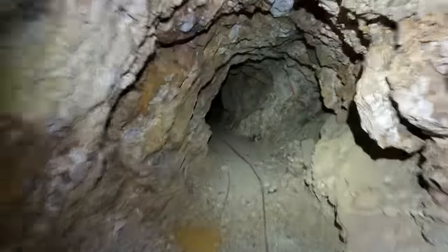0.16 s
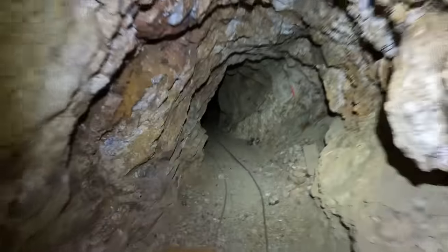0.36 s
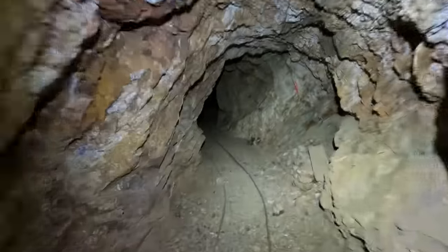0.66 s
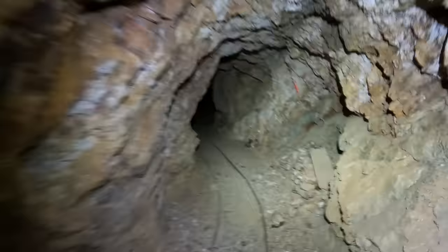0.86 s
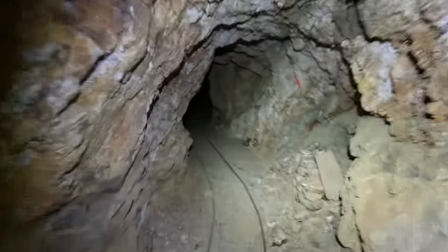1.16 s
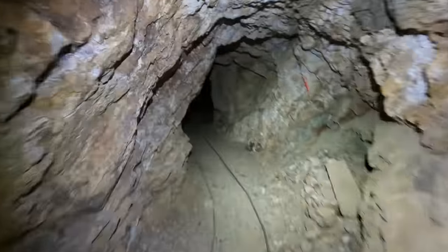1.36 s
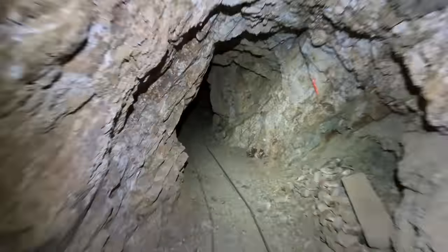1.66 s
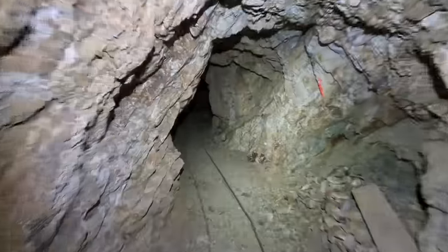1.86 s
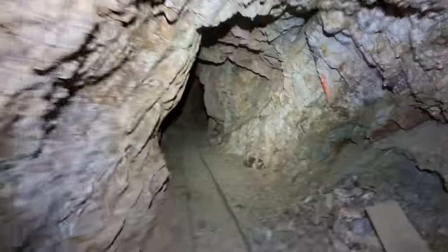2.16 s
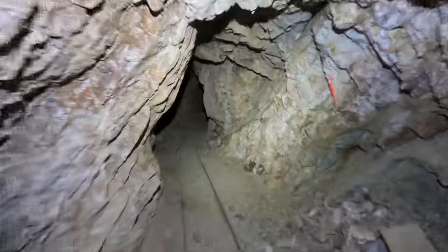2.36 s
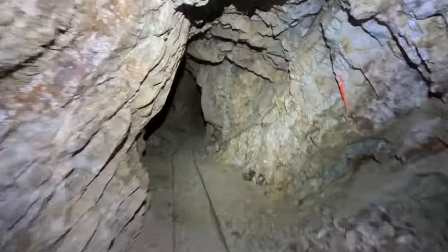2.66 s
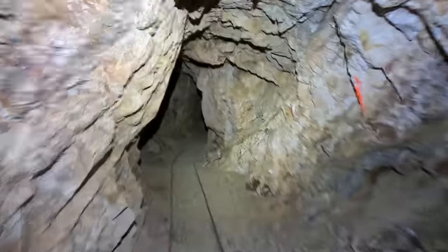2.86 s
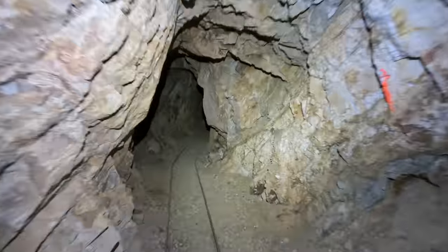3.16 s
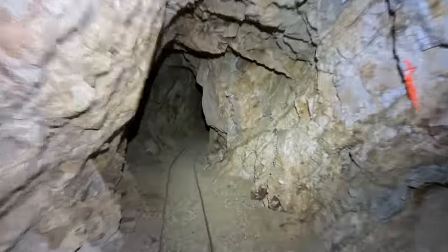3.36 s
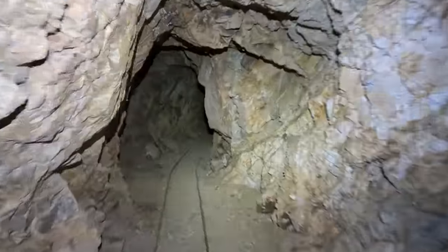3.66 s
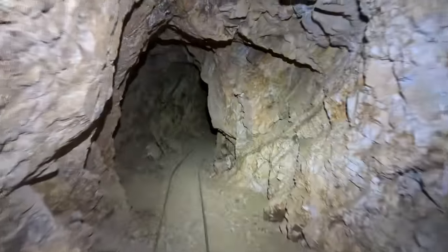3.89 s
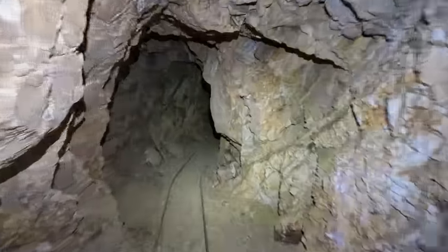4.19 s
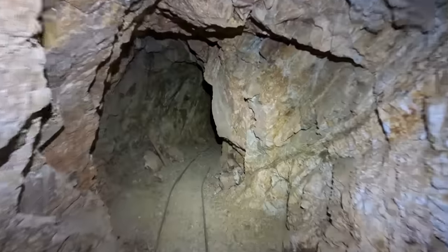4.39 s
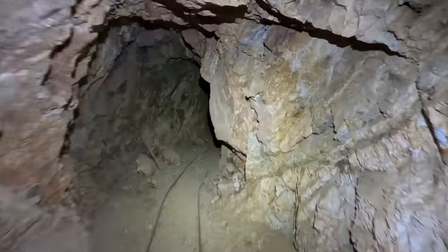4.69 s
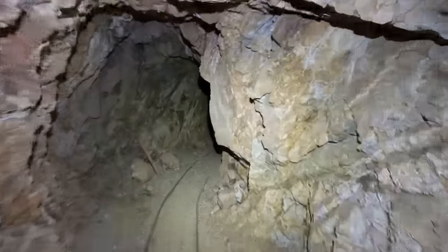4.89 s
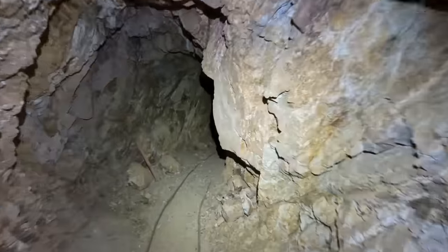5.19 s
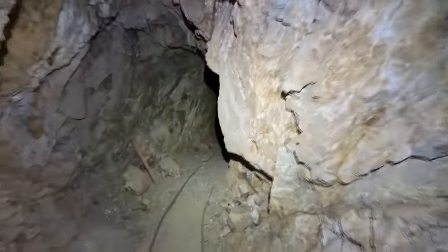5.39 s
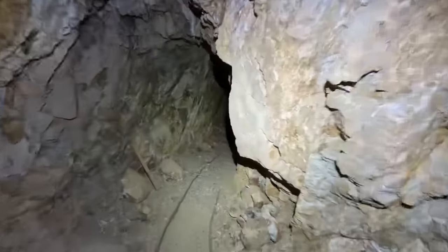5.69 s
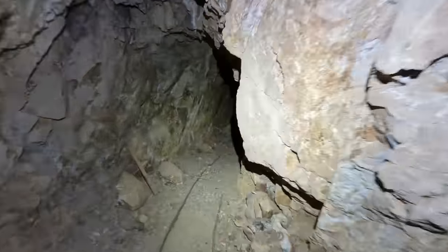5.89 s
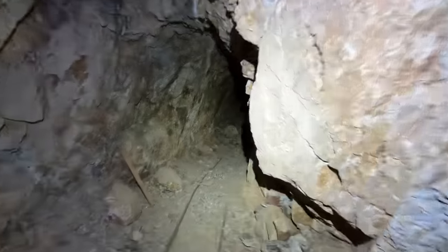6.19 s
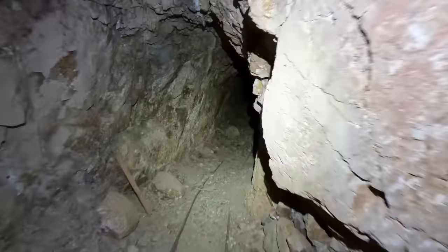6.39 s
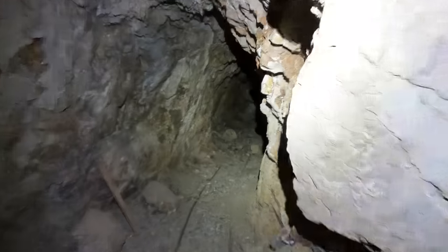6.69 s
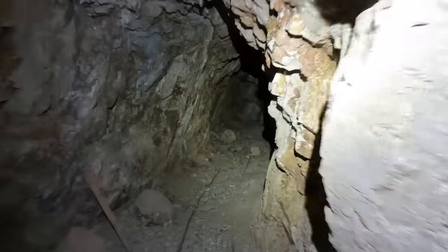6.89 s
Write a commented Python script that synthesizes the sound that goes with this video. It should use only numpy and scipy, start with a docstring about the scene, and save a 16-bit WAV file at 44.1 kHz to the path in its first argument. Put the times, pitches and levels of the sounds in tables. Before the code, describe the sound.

Boots grind rubble close below a carried stereo microphone. Sharp grit snaps and a woody thunk open the walk; small stones clatter, then softer steps and faint trickling follow. Firmer stone knocks land after four seconds, and the last second is busy with crunching. Deep soft rumbles jolt the microphone; the small tunnel adds a short dry tail.

```python
"""A narrow mine tunnel, loose rock and gravel underfoot; the walker carries a camera with two microphone ports.
From the start stones grind (ringing clicks), grit and cloth rasp (filtered grains) and strides shake the ports
(low noise); the rough walls add a short tail of sparse echoes. Soon grit snaps (noise bursts), then stones
knock (short rings and settling noise); a rocked loose board rings briefly near 0.3 s (decaying modes).
The steps go on to the end at 7 s, the loose ground trickling more faintly for a while around 4 s."""
import sys
import numpy as np
from scipy import signal
from scipy.fft import rfft, irfft, next_fast_len
from scipy.io import wavfile
from scipy.ndimage import uniform_filter1d

SR = 44100
rng = np.random.default_rng(int(sys.argv[2]) if len(sys.argv) > 2 else 0)


def wav_out(sig):
    """Save sig, one row per channel (or a flat mono array), as 16-bit PCM at SR to the path in sys.argv[1]."""
    wavfile.write(sys.argv[1], SR, np.round(np.clip(np.atleast_2d(sig).T, -1, 1) * 32767).astype(np.int16))


N = 310832

# Boot levels below (all but the jolts) are relative: scene() sets the boots' overall level.
# a boot loading the stones: [peak t/s, level/dB, weight of large stones/dB, last 10 dB of rise/ms, 10 dB fall/ms]
BOOT_LOADS = [(0.12, -61, -7, 30, 108), (0.26, -49.5, 21.5, 3, 153), (0.36, -33, -11, 79, 58),
              (0.6, -51.5, 13, 43, 211), (0.8, -38.5, -4, 55, 45), (0.885, -36.5, 2, 43, 57),
              (0.97, -37.5, 4.5, 23, 100), (1.05, -49, 6, 25, 50), (1.36, -58, 17.5, 20, 24),
              (1.5, -47, 1, 42, 172), (1.59, -40, 1, 25, 63), (1.66, -45, 8.5, 48, 36),
              (1.82, -54, -15, 28, 50), (2.178, -42, 0, 24, 105), (2.3, -47, 5.5, 38, 125),
              (2.599, -43, 2, 47, 95), (2.77, -44, -5, 48, 54), (2.885, -38, 2, 37, 80),
              (2.96, -40, 4.5, 48, 71), (3.05, -45, 1, 27, 64), (3.42, -49, -22, 87, 150),
              (3.575, -38, -1.5, 14, 70), (3.65, -38, -2, 80, 79), (3.79, -45.5, -3, 30, 37),
              (4.2, -51, 6, 106, 200), (4.3, -39.5, 1.5, 80, 62), (4.38, -32.5, 5.5, 46, 55),
              (4.66, -58.5, 9.5, 60, 108), (4.8, -47, -3, 88, 28), (4.86, -42, 7.5, 20, 60),
              (4.92, -33.5, 4.5, 35, 97), (5.22, -52.5, -1, 43, 82), (5.305, -50, -8, 9, 14),
              (5.46, -47.5, 0, 46, 41), (5.54, -36, 1, 15, 89), (5.605, -39, 9.5, 45, 53),
              (5.73, -41.5, -2, 31, 55), (5.811, -45.5, -1.5, 50, 79), (5.99, -47, -3.5, 34, 200),
              (6.155, -29, -2, 35, 35), (6.24, -44, 6, 60, 57), (6.4, -51, -9, 60, 97),
              (6.518, -43, 8, 36, 154), (6.67, -39, 11.5, 33, 35), (6.76, -44, 4.5, 60, 62),
              (6.82, -34, -3, 35, 90), (6.875, -38.5, 4.5, 52, 79)]
# loose ground trickling between the steps: [t/s, stones level/dB, grit level/dB]
TRICKLE = [(0.0, -54.5, -55.5), (0.7, -56, -56), (1.4, -59, -59), (1.95, -58, -57.5), (2.5, -67, -55),
           (3.2, -63, -66.5), (3.45, -60, -58), (3.88, -80, -65), (4.05, -88, -65), (4.6, -58, -75),
           (5.36, -81, -69), (5.95, -65, -60.5), (6.35, -54, -59), (7.05, -58, -59)]
TRICKLE_LARGE_DB, TRICKLE_GRIT_HZ = 4, 4750  # weight of large stones, pitch that stands out in the grit
# spectra of the small and the large stones: [f/Hz, relative level/dB]
SMALL_STONE_SPECTRUM = [(260, -9.5), (450, 4), (700, 3), (1050, 8.5), (1500, 5), (2300, -3.5),
                        (3500, -21.5), (5000, -48.5)]
LARGE_STONE_SPECTRUM = [(41, -58), (70, 11), (130, -5.5), (237, 2), (397, -0.5), (443, -4), (650, -10.5),
                        (840, -28.5), (1430, -120)]
# a sole scuffing through grit: [peak t/s, level/dB, strongest f/Hz, last 10 dB of rise/ms, 10 dB fall/ms]
SOLE_SCUFFS = [(0.254, -26, 6100, 10.5, 37), (0.33, -29.5, 5400, 19, 35), (0.389, -35.5, 4300, 28, 22),
               (0.5, -49.5, 4500, 104, 300), (0.585, -42.5, 3740, 15, 26), (0.72, -47, 4000, 22, 98),
               (0.89, -45, 4300, 33, 90), (1.03, -50, 3620, 150, 60), (1.154, -35, 4400, 10, 27),
               (1.361, -44.5, 5300, 120, 34), (1.53, -53, 4000, 31, 50), (1.61, -44, 3600, 64, 40),
               (1.75, -52.5, 3740, 38, 115), (1.945, -49, 7650, 33, 25), (2.195, -41.5, 4500, 16, 14),
               (2.32, -49.5, 5000, 59, 52), (2.45, -46, 5800, 67, 60), (2.55, -47, 5030, 28, 51),
               (2.6, -44.5, 4970, 50, 13), (2.75, -52.5, 5540, 139, 80), (2.9, -46, 4340, 94, 113),
               (3.274, -48.5, 5500, 35, 41), (3.575, -42, 3220, 13, 96), (3.7, -50.5, 4500, 102, 65),
               (3.945, -47, 5800, 20, 33), (4.18, -46.5, 4900, 54, 66), (4.27, -49.5, 3160, 43, 80),
               (4.334, -38, 4500, 11, 84), (4.43, -57, 6900, 28, 35), (4.615, -52, 5360, 36, 118),
               (4.81, -51, 3170, 72, 50), (4.9, -36.5, 3420, 37, 89), (4.966, -35, 3950, 31, 19),
               (5.05, -51, 3280, 30, 58), (5.22, -49, 4530, 31, 66), (5.47, -46.5, 4800, 61, 100),
               (5.54, -43.5, 3300, 17, 90), (5.61, -45, 3880, 60, 66), (5.82, -53.5, 4380, 150.5, 88),
               (6.07, -50.5, 4780, 46.5, 100), (6.152, -30, 4700, 21, 32), (6.23, -45.5, 3700, 50, 74),
               (6.41, -43.5, 6060, 67, 73), (6.489, -37.5, 4600, 40, 74), (6.585, -37.5, 5260, 31, 47),
               (6.66, -33, 4070, 17, 24), (6.74, -46.5, 3950, 60, 200), (6.811, -34.5, 4000, 13, 48),
               (6.88, -47.5, 3370, 53, 81)]
# spectrum of the grit before its moving resonance: [f/Hz, relative level/dB]
GRIT_SPECTRUM = [(1180, 7), (2000, 1.5), (3350, -1), (4220, -3), (4520, -4), (4930, -3), (5950, -4.5),
                 (7630, -3), (9630, -10), (12000, 2.5), (14200, -16.5), (15600, -4.5)]
# finest grains under the coarse ones: [t/s, level/dB]
FINE_GRAINS = [(0.0, 0.5), (1.0, -5), (2.8, -2), (3.4, -6), (7.05, -6)]
# strides jolting the camera: [peak t/s, level/dB, last 10 dB of rise/ms, 10 dB fall/ms]
STRIDE_JOLTS = [(0.33, -23, 200, 350), (0.58, -28, 350, 87), (0.84, -30.5, 51, 400), (1.04, -11, 39, 74),
                (1.37, -31, 300, 357), (1.8, -23.5, 150, 196), (2.29, -16.5, 77, 39), (2.55, -26, 475, 28),
                (2.75, -27, 78, 15), (2.9, -33, 97, 240), (3.18, -24.5, 450, 43), (3.49, -16, 39, 170),
                (4.24, -28.5, 640, 200), (4.43, -21.5, 43, 192), (4.79, -22, 70, 240), (4.98, -14, 50, 125),
                (5.34, -26.5, 65, 376), (5.9, -30.5, 896, 64), (6.22, -14.5, 86, 81), (6.82, -25, 97, 900)]
SWAY_DB = -37  # the camera never rests between strides
# spectrum of the rumble: [f/Hz, relative level/dB]
RUMBLE_SPECTRUM = [(2.4, -44), (4.0, 9), (16, -2.5), (23, -2), (31, -6), (71, -30), (103, -51), (130, -32),
                   (170, -48), (290, -120)]
SWELL_ROUNDING = 0.038  # how rounded the top of a swell is, as a share of its 10 dB rise or fall
# decay of the tunnel tail: [f/Hz, t60/s]
TAIL_DECAY = [(150, 0.35), (500, 0.14), (1500, 0.047), (4000, 0.064), (10000, 0.012)]
# strength of the tunnel tail: [f/Hz, level/dB]
TAIL_LEVEL = [(150, -20), (600, 0.5), (2000, -8), (8000, -4)]
# grit snapping: [t/s, peak level/dB, f/Hz, fade t60/s, left minus right/dB]
GRIT_SNAPS = [(0.061, -38, 4160, 0.16, 3), (0.2456, -25.5, 4050, 0.26, 5), (0.313, -19, 5760, 0.11, 4),
              (0.326, -28, 4450, 0.03, 2), (0.3756, -18.5, 4900, 0.024, 2),
              (0.644, -35.5, 4100, 0.057, 2.5), (0.854, -39, 4110, 0.11, 3), (0.883, -37, 3580, 0.15, 3),
              (1.149, -25.5, 4900, 0.12, 4), (1.429, -46, 8300, 0.066, 11), (1.482, -39, 7740, 0.058, 8),
              (1.598, -36, 3320, 0.12, 5), (1.67, -36.5, 3260, 0.12, 5), (1.845, -45.5, 9000, 0.032, 6),
              (1.911, -47, 2900, 0.14, 9), (2.002, -42.5, 8300, 0.059, 4.5), (2.167, -43, 3020, 0.22, 4),
              (2.3722, -36, 6900, 0.051, 6), (2.435, -37, 7040, 0.049, 13),
              (2.466, -34.5, 6250, 0.024, 3.0), (2.6797, -36, 5500, 0.02, 3),
              (3.5657, -32.5, 2310, 0.17, 6), (4.326, -34.5, 6900, 0.1, 4), (4.42, -33, 7440, 0.087, 4),
              (4.747, -37, 2440, 0.023, 6), (4.801, -36, 2860, 0.028, 13), (4.81, -43, 4500, 0.046, 0),
              (4.847, -26.5, 5150, 0.042, 6), (4.886, -26.5, 2230, 0.13, 3), (4.9587, -34, 3000, 0.088, 7),
              (5.0387, -28.5, 2430, 0.025, 3), (5.167, -41, 4100, 0.091, 4), (5.208, -38, 2500, 0.039, 8),
              (5.4, -40, 5150, 0.053, 1), (5.5294, -32, 2600, 0.13, 2), (6.0743, -44, 4900, 0.088, 5.5),
              (6.358, -47, 2650, 0.059, -9), (6.474, -30, 6440, 0.13, -1), (6.64, -29, 4730, 0.072, 3),
              (6.6553, -23, 4520, 0.025, -7), (6.802, -31.5, 7300, 0.14, 5)]
# single stones knocking: [t/s, level/dB, f/Hz, rattle t60/s, left minus right/dB]
STONE_KNOCKS = [(0.108, -27.5, 1110, 0.065, 3), (0.241, -26.5, 367, 0.081, 7), (0.311, -26.5, 437, 0.21, 6),
                (0.342, -19.5, 258, 0.18, -2), (0.562, -33, 850, 0.18, 7), (0.584, -31, 825, 0.19, 3),
                (0.646, -28, 790, 0.1, 6), (0.697, -26.5, 910, 0.12, 5), (0.793, -26, 935, 0.056, 10),
                (0.795, -33, 1300, 0.039, 3), (0.855, -25.5, 744, 0.1, -1), (0.867, -19.5, 960, 0.041, 9.5),
                (0.967, -24.5, 330, 0.029, 1), (1.023, -25.5, 970, 0.089, 8), (1.48, -33.5, 950, 0.05, 7),
                (1.529, -37, 1300, 0.04, 5), (1.562, -29, 342, 0.05, 3), (1.576, -23, 1030, 0.049, 6),
                (1.607, -27, 1070, 0.078, 2), (1.642, -22.5, 336, 0.087, 2), (1.668, -32, 1300, 0.05, 1),
                (1.747, -34.5, 1250, 0.04, 4), (1.786, -36, 1210, 0.025, 4), (1.895, -42, 1400, 0.029, 4),
                (2.162, -31, 420, 0.12, 1.5), (2.188, -32.5, 507, 0.12, 2), (2.266, -37, 354, 0.12, 4),
                (2.37, -34.5, 900, 0.07, 3), (2.679, -35, 1930, 0.029, 6), (2.757, -36, 1320, 0.032, 19),
                (2.818, -32, 1090, 0.057, 5), (2.868, -26.5, 930, 0.065, 6), (2.884, -28.5, 478, 0.18, 2),
                (2.897, -25, 935, 0.054, -2), (2.944, -31.5, 620, 0.068, 3), (3.034, -27.5, 970, 0.035, 2),
                (3.472, -33, 1220, 0.037, 8), (3.566, -26.5, 1740, 0.11, 4), (3.598, -32, 400, 0.22, 0),
                (3.637, -34, 384, 0.1, -1), (3.679, -35, 1220, 0.054, 6), (3.731, -25.5, 1180, 0.02, 5),
                (3.793, -34, 1060, 0.095, 3), (4.327, -26.5, 646, 0.097, 2), (4.36, -14.5, 683, 0.065, 3),
                (4.365, -16.5, 464, 0.032, 0), (4.503, -33.5, 950, 0.032, 5),
                (4.547, -38.5, 1040, 0.024, 7), (4.702, -35.5, 890, 0.038, 5),
                (4.831, -27.5, 1060, 0.063, 7), (4.888, -20, 600, 0.13, 1.5), (4.917, -18, 710, 0.08, 2),
                (5.206, -35.5, 945, 0.049, 5), (5.262, -35.5, 860, 0.038, 4),
                (5.406, -35.5, 1180, 0.055, 5), (5.438, -30.5, 610, 0.094, 3),
                (5.534, -22, 427, 0.029, 3.5), (5.59, -24, 910, 0.16, 3), (5.607, -26.5, 790, 0.15, 1),
                (5.78, -31, 1120, 0.017, 6), (5.963, -39.5, 1010, 0.18, 6), (6.127, -26.5, 376, 0.068, 3),
                (6.146, -16.5, 400, 0.13, 3), (6.415, -35.5, 1020, 0.074, 1), (6.474, -34.5, 1200, 0.24, 5),
                (6.519, -30, 636, 0.17, 1), (6.555, -31, 466, 0.18, 0), (6.64, -21, 1050, 0.077, 4),
                (6.655, -16, 1050, 0.031, 8), (6.662, -16, 567, 0.083, 2), (6.804, -18, 433, 0.05, 2.5),
                (6.884, -35, 1550, 0.082, 0), (6.981, -32, 1550, 0.036, 4)]
# the boot rocking the loose board: [t/s, level/dB, contact time/ms]
BOARD_ROCKS = [(0.233, -22, .8), (0.28, -17, 5), (0.332, -3, 5)]
# modes of the board: [f/Hz, width/Hz, level before the contact dulls it/dB]
BOARD_RINGS = [(192, 8, 0), (250, 20, 7), (355, 30, -4)]
# level between the ports: [f/Hz, left minus right/dB]
PORT_LEAN = [(15, -7.5), (35, -1.5), (70, -0.5), (140, -2), (400, 1), (1300, 3.5), (4400, 1.5), (8000, 3.5),
             (15000, 2)]
# phase between the ports: [f/Hz, lead of the left/rad]
PORT_LEAD = [(20, 0), (300, 0), (1120, -.2), (2930, -.7), (5170, .3), (9560, 0)]
# share of the sound that differs between the ports: [f/Hz, share]
PORT_SPREAD = [(20, .12), (60, .3), (130, .17), (300, .12), (500, .28), (1000, .3), (2000, .5),
               (12000, .58)]
# response of the microphone: [f/Hz, level/dB]
MIC_RESPONSE = [(50, -4), (9000, 4.5), (12500, -11.5), (14000, -4.5), (15500, -25), (16500, -40)]
BAND_EDGE_HZ = 15720


def amp(db):
    """Amplitude for a level in dB."""
    return 10 ** (np.asarray(db) / 20)


def evened(x):
    """The sound brought to rms 1."""
    return x / np.sqrt(np.mean(x ** 2) + 1e-20)


def read(points, hz):
    """A curve over frequency, read on a logarithmic axis."""
    f, value = np.transpose(points)
    return np.interp(np.log(hz + 1), np.log(f + 1), value)


def columns(rows):
    """The columns of a curve over time, one value a sample."""
    t, *values = np.transpose(rows)
    return [np.interp(np.arange(N) / SR, t, v) for v in values]


def coloured(x, points, size=4096):
    """Causal (minimum-phase) filter with the given spectrum, rms 1."""
    level_db = read(points, abs(np.fft.fftfreq(size, 1 / SR)))
    log_gain = np.log(amp(np.maximum(level_db, -100)))
    taps = np.fft.ifft(np.exp(np.conj(signal.hilbert(log_gain)))).real[:size // 2]
    return evened(signal.oaconvolve(x, taps[None], axes=1)[:, :N])


def butter(x, order, hz, kind):
    """Butterworth filter: low, high or band."""
    return signal.sosfilt(signal.butter(order, hz, kind, fs=SR, output="sos"), x)


def grains(per_s, spread_db, clump_s, clump_db):
    """Random clicks of uneven size that come in clumps, in two rows alike in time and size but not in sign."""
    size_db = spread_db * np.minimum(rng.exponential(1, N), 4)
    size = amp(size_db) * rng.choice([-1., 1.], (2, N))
    clumps = evened(uniform_filter1d(rng.standard_normal(N), max(int(clump_s * SR), 2)))
    return size * (rng.random(N) < per_s / SR) * amp(clump_db * clumps)


def swells(peak_s, level_db, rise_ms, fall_ms):
    """Power of each event over time: it climbs to its peak and sinks away at a steady dB rate."""
    late_ms = 1000 * (np.arange(0, N + 64, 64)[:, None] / SR - peak_s)  # one value every 64 samples
    rising, falling = -late_ms / np.maximum(rise_ms, 5), late_ms / np.maximum(fall_ms, 5)
    away = np.where(late_ms < 0, rising, falling)
    drop_db = 10 * (np.hypot(away, SWELL_ROUNDING) - abs(SWELL_ROUNDING))
    return amp(2 * (level_db - drop_db))


def per_sample(slow):
    """A curve held every 64 samples, filled in to every sample."""
    return np.interp(np.arange(N), np.arange(len(slow)) * 64, slow)


def add(mix, s, sound, pan_db):
    """Places a sound at its time, leaning left by pan_db."""
    part = mix[:, round(s * SR):][:, :len(sound)]
    part += amp([[pan_db / 2], [-pan_db / 2]]) * sound[:part.shape[1]]


def stones(per_s, spread_db, lo_hz, hi_hz, cycles, count):
    """Each click rings a stone of one of several sizes for a few cycles."""
    clicks = grains(per_s, spread_db, 0.012, 2.0)
    which = rng.integers(0, count, N)
    t, out = np.arange(1500) / SR, 0
    for k, hz in enumerate(np.geomspace(lo_hz, hi_hz, count)):
        ring = np.sin(2 * np.pi * hz * t) * np.exp(-t * hz / cycles)
        out = out + signal.oaconvolve(clicks * (which == k), ring[None] * hz, axes=1)[:, :N]  # equal energy per Hz
    return out


def grind():
    """Small stones clack, large ones thud; both follow the load on the boot, over the trickling ground."""
    peak_s, level_db, large_db, rise_ms, fall_ms = np.transpose(BOOT_LOADS)
    load = swells(peak_s, level_db, rise_ms, fall_ms)
    trickle = amp(2 * columns(TRICKLE)[0])
    small = coloured(stones(3500, 2.6, 400, 3500, 2.5, count=14), SMALL_STONE_SPECTRUM)
    large = coloured(stones(1500, 2.07, 71.3, 833, 1.0, count=8), LARGE_STONE_SPECTRUM)
    small_power = per_sample(load.sum(1)) + trickle
    large_power = per_sample(load @ amp(2 * large_db)) + trickle * amp(2 * TRICKLE_LARGE_DB)
    return np.sqrt(small_power) * small + np.sqrt(large_power) * large


def resonate(x, hz, width_hz):
    """Shifts the curve hz down to zero, smooths, and shifts back: a moving resonance."""
    turn = np.exp(2j * np.pi * np.cumsum(hz) / SR)
    r = np.exp(-np.pi * width_hz / SR)
    return 2 * (turn * signal.lfilter([1 - r], [1, -r], x / turn)).real


def rasp():
    """Dense sand with sparse sharp ticks of grit; the grain size sets the pitch that stands out."""
    peak_s, level_db, hz, rise_ms, fall_ms = np.transpose(SOLE_SCUFFS)
    drag = swells(peak_s, level_db, rise_ms, fall_ms)
    trickle = amp(2 * columns(TRICKLE)[1])
    power = per_sample(drag.sum(1)) + trickle
    grain_hz = (per_sample(drag @ hz) + trickle * TRICKLE_GRIT_HZ) / power  # the loudest scuff leads
    coarse, fine = (evened(grains(per_s, 1.48, .006, 1.93)) for per_s in (9000, 14000))
    ticks = 0.32 * evened(grains(70, 3.3, 0.054, 1.0))
    coarse, fine = coloured(coarse + ticks, GRIT_SPECTRUM), coloured(fine + ticks, GRIT_SPECTRUM)
    coarse = coarse + 17.0 * resonate(coarse, grain_hz, 4600)
    coarse, fine = butter(coarse, 4, 8500, "low"), butter(fine, 4, 8500, "high")
    return np.sqrt(power) * (evened(coarse) + amp(columns(FINE_GRAINS)[0]) * evened(fine))


def jolts():
    """Level of the rumble: every stride jolts the camera, which sways a little in between."""
    return np.sqrt(per_sample(swells(*np.transpose(STRIDE_JOLTS)).sum(1)) + amp(2 * SWAY_DB))


def shake():
    """Low lumpy rumble at the microphones, steadied so that it follows the stride."""
    rumble = coloured(rng.standard_normal((2, N)), RUMBLE_SPECTRUM, size=32768)
    steadied = rumble / np.sqrt(uniform_filter1d(rumble ** 2, 6000) + 0.031)
    return jolts() * evened(steadied)


def echoes():
    """Sparse echoes of random sign from the rough walls, each band dying at its own speed."""
    taps = np.zeros((2, SR // 2))
    at = np.arange(120, SR // 2 - 20, 20)  # one echo in every 20 samples
    at = at + rng.integers(0, 20, (2, len(at)))
    np.put_along_axis(taps, at, rng.choice([-1., 1.], at.shape), 1)
    hz, t, (both, side) = signal.stft(taps, SR, nperseg=256)
    apart = np.clip(read(PORT_SPREAD, hz), 0, 1)[:, None]  # long waves reach both ports alike
    z = np.sqrt(1 - apart ** 2) * both + apart * side * np.array([1, -1])[:, None, None]
    t60 = read(TAIL_DECAY, hz)[:, None]
    fade = amp(read(TAIL_LEVEL, hz)[:, None] - 60 * t / t60) / np.sqrt(t60)
    tail = signal.istft(z * fade, SR, nperseg=256)[1]
    return tail * np.sqrt(6 * np.log(10) * 20 / SR)


def tunnel(x):
    """The walker keeps moving, so the echo pattern drifts between three stretches of wall."""
    turn = 2 * np.pi * 3 * np.arange(N) / SR  # 3 Hz
    shares = [np.sqrt(2 / 3) * np.cos(turn + k * np.pi / 3) for k in range(3)]  # constant total power
    return sum(signal.oaconvolve(x * share, echoes(), axes=1)[:, :N] for share in shares)


def snaps():
    """A sharp tick, then a burst of noise that rings at its own pitch and dies quickly."""
    out, t = np.zeros((2, N)), np.arange(5000) / SR
    bursts = rng.standard_normal((len(GRIT_SNAPS), len(t)))
    for (s, db, hz, t60, pan_db), noise in zip(GRIT_SNAPS, bursts):
        wide = butter(noise, 2, [0.34 * hz, min(1.71 * hz, .4 * SR)], "band")
        ringing = signal.lfilter(*signal.iirpeak(hz, 15, fs=SR), noise)
        burst = evened(wide) + .9 * evened(ringing)
        burst *= amp(-60 * t / max(t60, .01)) + 1.1 * amp(-60 * t / 0.0024)  # fade and tick
        add(out, s, amp(db) * burst / abs(burst).max(), pan_db)
    return out


def knocks():
    """A stone cracks and rings for a few cycles, then settles in uneven bumps around its own pitch."""
    out, t = np.zeros((2, N)), np.arange(5000) / SR
    rattle, bumps = rng.standard_normal((len(STONE_KNOCKS), 2, len(t))).transpose(1, 0, 2)
    bumps = amp(1.4 * evened(uniform_filter1d(bumps, size=90, axis=1)))
    for (s, db, hz, t60, pan_db), noise in zip(STONE_KNOCKS, rattle * bumps):
        ring = np.sin(2 * np.pi * hz * t) * np.exp(-t * hz / 2.7)
        ring += 0.26 * np.sin(2 * np.pi * 1.53 * hz * t) * np.exp(-t * hz / 1.6)  # a higher, shorter mode
        narrow = evened(butter(noise, 3, [.75 * hz, 1.4 * hz], "band"))
        wide = evened(butter(noise, 3, [.5 * hz, 2.1 * hz], "band"))
        settle = 0.62 * narrow + 0.33 * wide
        settle *= amp(-60 * t / max(t60, .01)) * (1 - np.exp(-t / 0.0037))
        crack = 0.21 * wide * np.exp(-t / 0.0006)
        add(out, s, amp(db) * (ring + settle + crack), pan_db)
    return out


def board():
    """Each soft blow rings the modes of the board; a longer contact dulls the upper ones and slows the rise."""
    out, t = np.zeros((2, N)), np.arange(SR // 2) / SR
    for s, blow_db, contact_ms in BOARD_ROCKS:
        contact_s = contact_ms / 1000
        ring = 0
        for hz, width_hz, db in BOARD_RINGS:
            level = amp(db) / (1 + (2 * hz * contact_s) ** 2)
            ring = ring + level * np.sin(2 * np.pi * hz * t) * np.exp(-np.pi * width_hz * t)
        add(out, s, amp(blow_db) * ring * (1 - np.exp(-t / (4 * contact_s))), 0)
    return out


def ports(x, other):
    """Two microphone ports differ in level and phase; part of the sound reaches them unequally."""
    size = next_fast_len(N)
    hz = np.fft.rfftfreq(size, 1 / SR)
    half = amp(read(PORT_LEAN, hz) / 2) * np.exp(.5j * read(PORT_LEAD, hz))  # half of the difference to each port
    apart = np.clip(read(PORT_SPREAD, hz), 0, 1)
    both, side = np.sqrt(1 - apart ** 2) * rfft(x, size), apart * rfft(other, size)
    return irfft(np.array([(both + side) * half, (both - side) / half]), size)[:, :N]


def scene():
    """The boots close by with their tunnel tail, and the shake that reaches the ports without a tail."""
    boots = ports(*(grind() + rasp())) + knocks() + snaps() + board()
    return amp(-2.0) * (boots + tunnel(boots)) + ports(*shake())


def record(dry):
    """The microphone lifts the treble but loses the highest of it; then the band limit."""
    size = next_fast_len(N)
    response = amp(read(MIC_RESPONSE, np.fft.rfftfreq(size, 1 / SR)))
    heard = irfft(rfft(dry, size) * response, size)[:, :N]
    band_limit = signal.firwin(2047, BAND_EDGE_HZ, window=("kaiser", 9), fs=SR)
    return signal.oaconvolve(heard, band_limit[None], "same")


dry = scene()
out = record(dry)
wav_out(out)
```